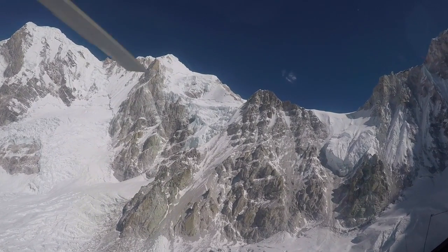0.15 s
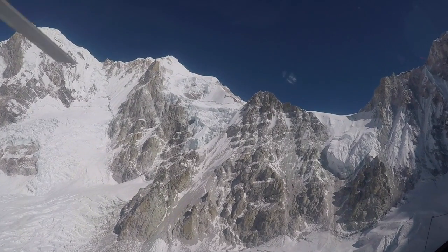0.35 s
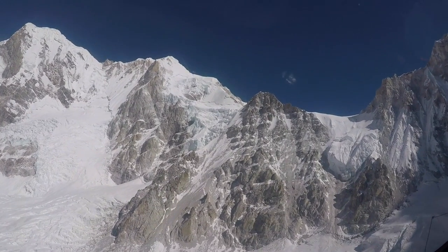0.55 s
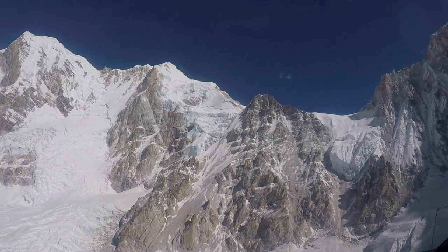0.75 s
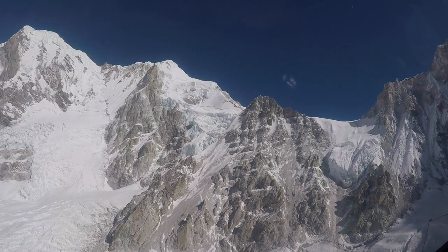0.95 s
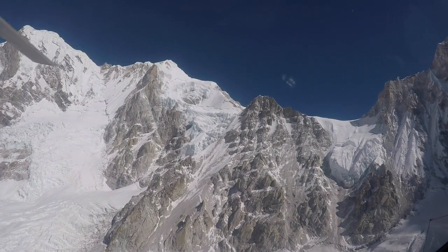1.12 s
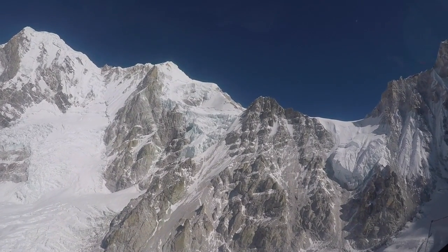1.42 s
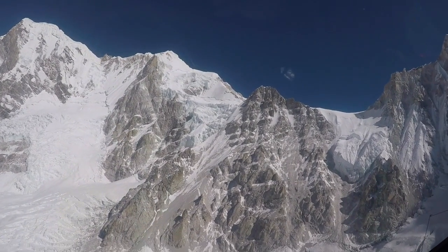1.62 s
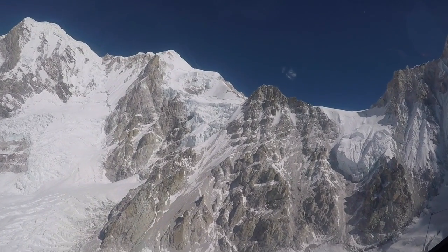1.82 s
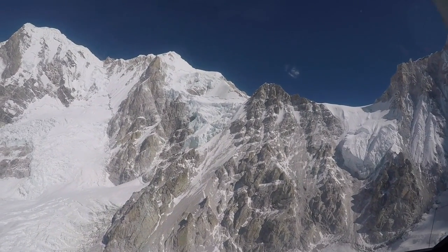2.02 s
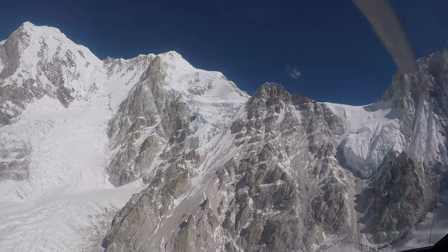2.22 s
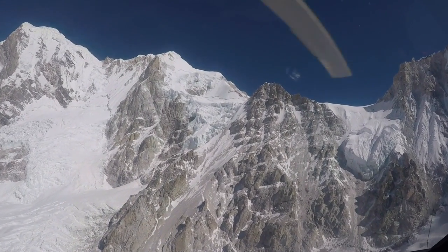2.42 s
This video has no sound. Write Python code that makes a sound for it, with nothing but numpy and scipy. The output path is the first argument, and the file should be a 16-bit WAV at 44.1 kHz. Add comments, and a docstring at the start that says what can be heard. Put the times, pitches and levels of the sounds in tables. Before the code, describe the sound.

A helicopter drones loudly in steady flight, heard inside the cabin, rotor throbbing under whining gears

```python
"""Inside the cabin of a helicopter in steady flight.
Throughout, the main rotor throbs and its blades chop a roar of filtered noise; the tail rotor buzzes,
shaft and fan beat in a loud drone, and gears and accessories whine above: all are sums of fluttering sines.
A gust soon thumps the cabin, a loose fitting then ticks twice, and three more gusts follow towards the end;
thumps and ticks are sines that die away."""
import sys
import numpy as np
from scipy import signal
from scipy.fft import rfft, irfft
from scipy.io import wavfile
from scipy.ndimage import uniform_filter1d, minimum_filter1d

SR = 44100
rng = np.random.default_rng(int(sys.argv[2]) if len(sys.argv) > 2 else 0)


def log_audio(samples):
    """Write samples as a 16-bit WAV file to the path given in sys.argv[1]."""
    # one column per channel
    frames = np.atleast_2d(samples).T
    # limit to full scale, then quantise
    limited = np.clip(frames, -1, 1)
    pcm = np.round(limited * 32767).astype(np.int16)
    wavfile.write(sys.argv[1], SR, pcm)


N = 112454
TIME = np.arange(N) / SR
SIDES = np.array([[1], [-1]])   # left, right
MAIN_REV_HZ, MAIN_BLADES = 6.51, 3


def from_db(db):
    """Level to amplitude: 20 dB is a factor of ten."""
    return 10 ** (np.asarray(db) / 20)


def at_hz(rows, hz):
    """Spectral interpolation: every column of a table, read on a log-frequency axis."""
    points, *columns = np.transpose(rows)
    return [np.interp(np.log(hz + 1), np.log(points + 1), column) for column in columns]


def drift(rate_hz):
    """Low-passed noise: a smooth random course with its corner at rate_hz, scaled to a spread of 1."""
    hz = np.arange(N + 1) * SR / (2 * N)
    spectrum = rfft(rng.standard_normal(2 * N))
    slow = irfft(spectrum / (1 + (hz / rate_hz) ** 2))
    return slow[:N] / slow.std()


def ring(start_s, level_db, pitch_hz, t60_s):
    """Damped free vibration: a struck mode is a sine that loses 60 dB in each t60_s."""
    age = np.maximum(TIME - start_s, 0)
    envelope = from_db(level_db - 60 * np.minimum(age / t60_s, 10))
    return envelope * np.sin(2 * np.pi * pitch_hz * age)


def partial(turns, level_db, pan_db, lead_rad, flutter, flutter_hz):
    """Phasor modulation: random in-phase and quadrature parts make a stereo tone flutter in strength and timing."""
    wobble = 1 + flutter * (drift(flutter_hz) + 1j * drift(flutter_hz))
    phasor = np.exp(2j * np.pi * turns) * wobble
    gains = from_db(SIDES * pan_db / 2)
    # Before flutter, level_db is the tone's mean power over the two sides
    amplitude = 2 * from_db(level_db) * gains / np.sqrt(np.sum(gains ** 2))
    return amplitude * np.real(phasor * np.exp(.5j * SIDES * lead_rad))


def harmonics(turns, rows, flutter, flutter_hz):
    """Fourier series: a part that repeats each cycle sounds at whole multiples of its rate."""
    return sum(partial(multiple * turns, level_db, pan_db, lead_rad, flutter, flutter_hz)
               for multiple, level_db, pan_db, lead_rad in rows)


def air(blade_passes):
    """Broadband noise under amplitude modulation: blade passes swell the low roar, and the hiss less so."""
    # Rush of air and turbine: frequency_hz, density_db [dB per Hz]
    air_spectrum = [(8, -52.5), (20, -46), (45, -50), (80, -40), (115, -41), (165, -46), (230, -49),
                    (320, -52), (430, -54.5), (565, -55.5), (598, -51.5), (650, -54), (720, -60),
                    (900, -62), (1150, -65), (1560, -67.5), (1700, -68.5), (1900, -68.5), (2700, -69),
                    (3600, -72.5), (5300, -73), (6300, -77.5), (7200, -82.5), (8200, -89.5), (10500, -92),
                    (11300, -104), (13300, -108)]
    # Its stereo image: frequency_hz, pan_db [left minus right], likeness [0-1], lead_rad [of the left]
    air_image = [(40, -.3, .98, .05), (100, 3, .98, .2), (220, 5.7, .95, .15), (400, 7.5, .83, -.3),
                 (490, 10, .72, -.6), (620, 5.8, .78, -1.4), (880, -1, .68, -1.8), (1130, -2, .55, -2.3),
                 (1400, -2.8, .28, 0), (2800, -2.3, .3, -.1), (3700, .5, .56, .1), (4700, 0, .2, .7),
                 (5600, .2, .25, 3.1), (8000, -1.5, .14, 3.5)]
    roar_chop, hiss_chop = 0.14, 0.056   # share of the amplitude
    chop_lag = .3                        # share of a blade pass
    roar_flicker_db, hiss_flicker_db = 0.34, 1
    roar_below_hz = 790

    hz = np.arange(N // 2 + 1) * SR / N
    density_db, = at_hz(air_spectrum, hz)
    pan_db, likeness, lead_rad = at_hz(air_image, hz)

    # A common and an opposed noise set how alike the two sides are
    common, opposed = rfft(rng.standard_normal((2, N)))
    noise = np.sqrt(1 + likeness) * common + SIDES * np.sqrt(1 - likeness) * opposed
    gains = from_db(SIDES * pan_db / 2)
    balance = gains * np.sqrt(SR / 2 / np.sum(gains ** 2, axis=0))
    noise = noise * balance * from_db(density_db) * np.exp(.5j * SIDES * lead_rad)

    low = 1 / (1 + (hz / roar_below_hz) ** 6)
    chop = np.cos(2 * np.pi * (blade_passes - chop_lag))
    roar = irfft(noise * low, N) * (1 + roar_chop * chop)
    hiss = irfft(noise * (1 - low), N) * (1 + hiss_chop * chop)
    return roar * from_db(roar_flicker_db * drift(29)) + hiss * from_db(hiss_flicker_db * drift(19))


def fitting_ticks():
    """Modal synthesis: each tick of the loose fitting excites all its short, high modes at once."""
    # Ticks: start_s, level_db [before the mode's own], brightness_db [per octave]
    ticks = [(0.8024, -40, 0), (0.9435, -31, -2)]
    # Modes of the fitting: pitch_hz, level_db [relative], t60_s
    fitting_modes = [(900, -4, .005), (1900, -2, .005), (3500, 1, .006), (5100, 0, .008), (7150, 2, 0.011),
                     (10300, -9, .008)]
    pivot_hz = 5000   # brightness tilts the modes about this pitch
    sound = np.zeros(N)
    for k, (pitch_hz, mode_db, t60_s) in enumerate(fitting_modes):
        polarity = (-1) ** k
        for start_s, level_db, brightness_db in ticks:
            tilt_db = brightness_db * np.log2(pitch_hz / pivot_hz)
            sound += polarity * ring(start_s, level_db + mode_db + tilt_db, pitch_hz, t60_s)
    return sound


def gust_thumps():
    """Heavily damped resonance: each gust sets off a low sine that dies within a few cycles."""
    # Gusts: start_s, level_db [of the sine's envelope at its start], pitch_hz
    gusts = [(.44, -35, 30), (1.872, -5, 44.4), (1.936, -9, 23), (2.307, -8, 33)]
    cycles = 5.5   # to fall by 60 dB
    return sum(ring(start_s, level_db, pitch_hz, cycles / pitch_hz) for start_s, level_db, pitch_hz in gusts)


def accessories(clock):
    """Pure-tone radiation: pumps and turbine each whine at a pitch of their own."""
    # Tones: pitch_hz, level_db, pan_db [left minus right], lead_rad [of the left]
    whines = [(663.4, -46, 6, -1.3), (676.4, -34.5, 8, -1.4), (1619.5, -49.5, -7, -.9),
              (1690.9, -50, 4, -.7), (3576.9, -61, -1, .1), (5235.5, -52, 9, 2.9)]
    return sum(partial(pitch_hz * clock + rng.random(), level_db, pan_db, lead_rad, flutter=0.059, flutter_hz=8)
               for pitch_hz, level_db, pan_db, lead_rad in whines)


def gearbox(clock):
    """Gear meshing: tones at multiples of the tooth rate, some swelling as the planet gears go round."""
    # Tones: multiple [of the tooth rate], level_db [before the swell], pan_db [left minus right],
    # lead_rad [of the left], swell [share of the amplitude, once per rotor turn]
    mesh_tones = [(1, -31.5, 8.5, -1.92, 0), (2, -40, -5.5, 2, 0.66), (3, -51.5, 8.5, -3, 0.5),
                  (4, -41.5, -1.5, 0.46, 0), (5, -42.5, 0.5, 0, 0.04), (6, -54.5, -1, -1, 0),
                  (8, -49.5, -8.5, 4, .1), (9, -57, -7, 5, 0)]
    mesh_hz, first_swell_s = 650.35, 0.062
    planets = np.cos(2 * np.pi * MAIN_REV_HZ * (clock - first_swell_s))
    sound = 0
    for multiple, level_db, pan_db, lead_rad, swell in mesh_tones:
        turns = multiple * mesh_hz * clock + rng.random()
        tone = partial(turns, level_db, pan_db, lead_rad, flutter=0.17, flutter_hz=20)
        sound = sound + (1 + swell * planets) * tone
    return sound


def shaft_and_fan(clock):
    """Beating: engine shaft and cooling fan, close in pitch, swell and fade at their difference frequency."""
    # Shaft and its 17-tooth pinion: multiple [of the turn rate], level_db, pan_db [left minus right],
    # lead_rad [of the left]
    shaft_tones = [(1, -16, 3, 0.37), (15, -58.5, -1, 3.6), (17, -34.5, -.5, 1.57), (34, -59, 13.5, 0.8)]
    shaft_hz, fan_hz = 101.13, 107.9
    first_beat_s = 0.067   # the two tones first align here
    shaft_turns = shaft_hz * clock + rng.random()
    fan_turns = shaft_turns + (fan_hz - shaft_hz) * (clock - first_beat_s)
    shaft = harmonics(shaft_turns, shaft_tones, flutter=.07, flutter_hz=10)
    fan = partial(fan_turns, level_db=-27.5, pan_db=3, lead_rad=0.33, flutter=0.092, flutter_hz=4)
    return shaft + fan


def tail_rotor(clock):
    """Blade-passing tones: two fast blades buzz, mostly at even multiples of the turn rate."""
    # Tones: multiple [of the turn rate], level_db, pan_db [left minus right], lead_rad [of the left]
    tail_tones = [(1, -32, 4.5, .2), (2, -20.5, 2, 0.09), (4, -27, 0.5, -0.099), (6, -26.5, 5.5, .2),
                  (8, -37, 13, 0.45), (10, -58.5, 10, -.2), (12, -51, 6, -.4)]
    tail_rev_hz = 34.473
    return sum(partial(multiple * tail_rev_hz * clock + rng.random(), level_db, pan_db, lead_rad,
                       flutter=.1, flutter_hz=12)
               for multiple, level_db, pan_db, lead_rad in tail_tones)


def main_rotor(blade_passes):
    """Periodic blade loading: each pass sends a pressure pulse, built from harmonics of the blade rate."""
    # Tones: multiple [of the blade rate], level_db, pan_db [left minus right], lead_rad [of the left]
    blade_tones = [(1, -25, 0, .1), (2, -32, 1, .2), (3, -39, 2.5, .2), (4, -39, 2, .2), (5, -31.5, 3, .2)]
    return harmonics(blade_passes, blade_tones, flutter=0.3, flutter_hz=2.3)


def scene():
    """Frequency modulation by one slightly wandering clock, which every turning part shares."""
    speed_wander, wander_hz = .0003, 0.48   # spread as a share of the speed, corner of the drift
    first_blade_s = .036
    clock = TIME + speed_wander * np.cumsum(drift(wander_hz)) / SR
    blade_passes = MAIN_BLADES * MAIN_REV_HZ * (clock - first_blade_s)
    background = air(blade_passes) + fitting_ticks() + gust_thumps()
    machinery = accessories(clock) + gearbox(clock) + shaft_and_fan(clock)
    return background + machinery + tail_rotor(clock) + main_rotor(blade_passes)


def record(dry):
    """Peak limiting, then low-pass filtering: one gain holds down both sides' crests, and a steep cut ends the top."""
    limit_db, limit_s, cutoff_hz = -1.9, .008, 13750   # ceiling ahead of the filter, reaction time, top
    size = max(int(limit_s * SR), 2)
    peak = np.abs(dry).max(axis=0)
    allowed = np.minimum(1, from_db(limit_db) / (peak + 1e-9))
    gain = uniform_filter1d(minimum_filter1d(allowed, size), size)
    low_pass = signal.ellip(10, .1, 80, cutoff_hz, fs=SR, output="sos")
    return signal.sosfilt(low_pass, dry * gain)


dry = scene()
out = record(dry)
log_audio(out)
```